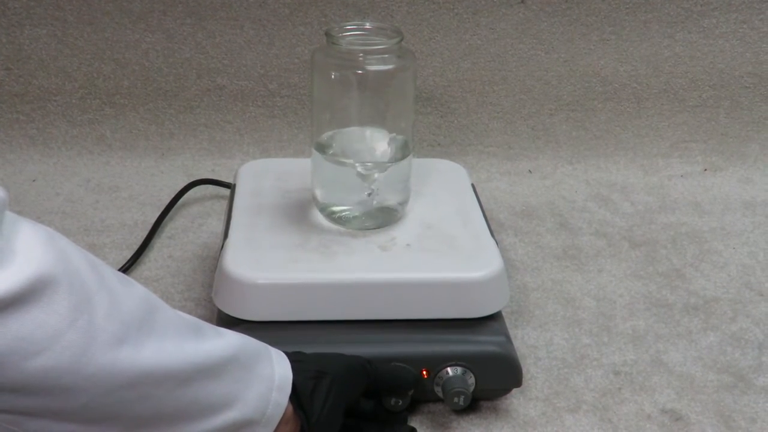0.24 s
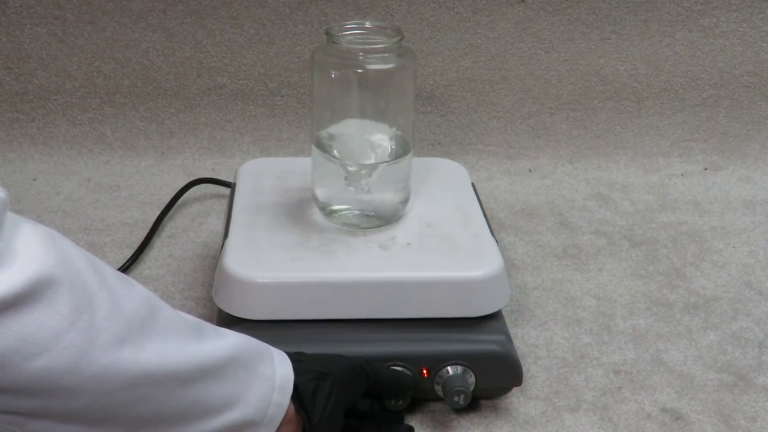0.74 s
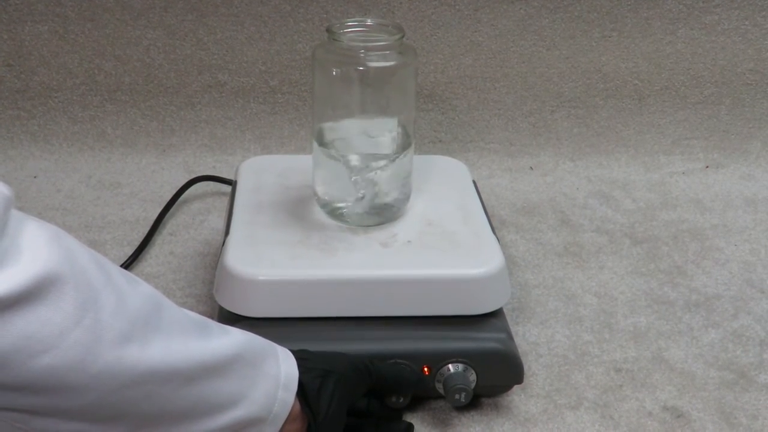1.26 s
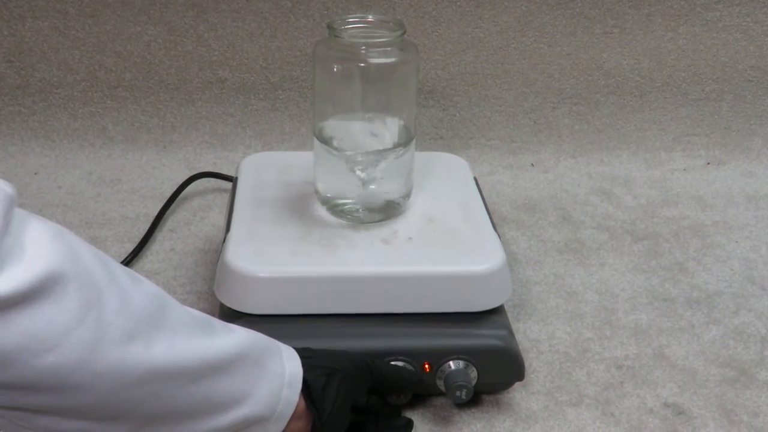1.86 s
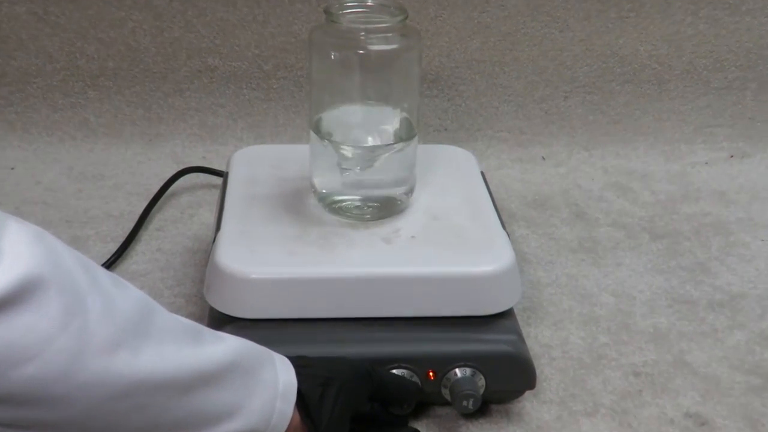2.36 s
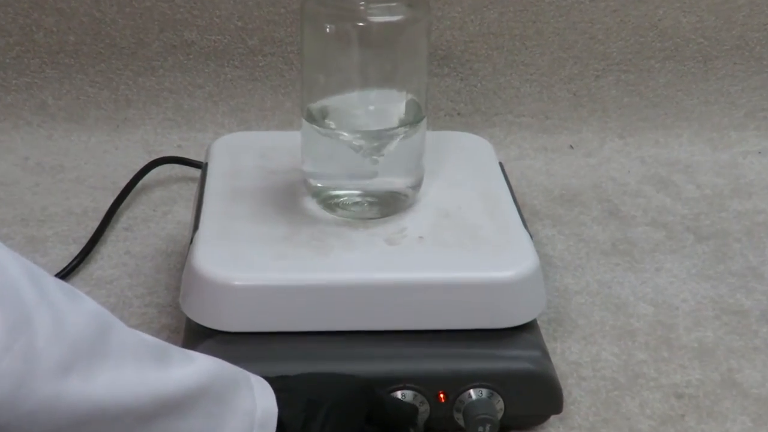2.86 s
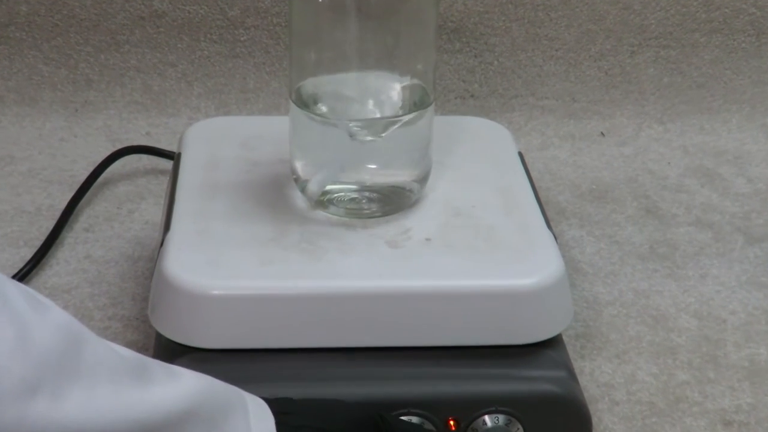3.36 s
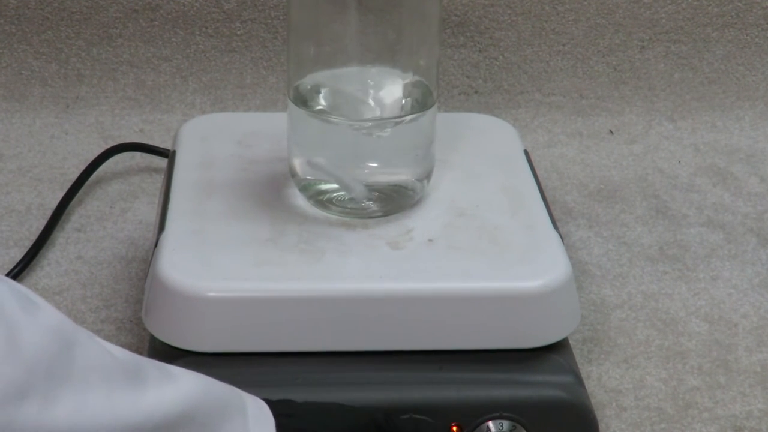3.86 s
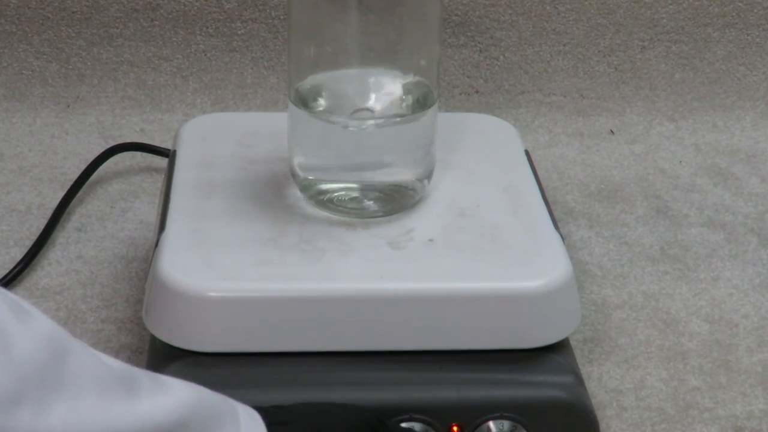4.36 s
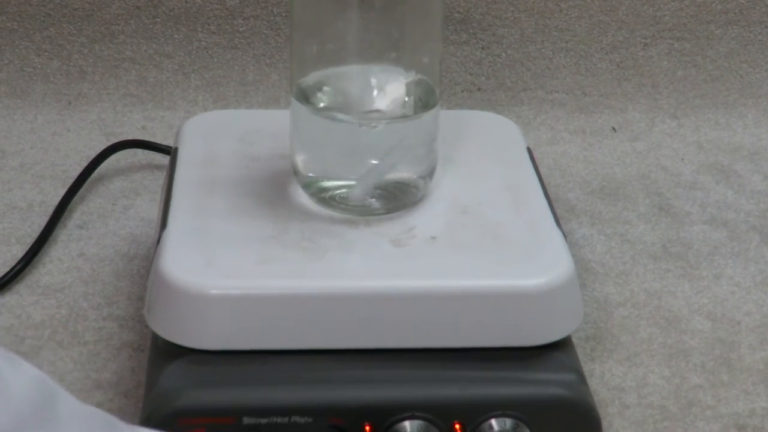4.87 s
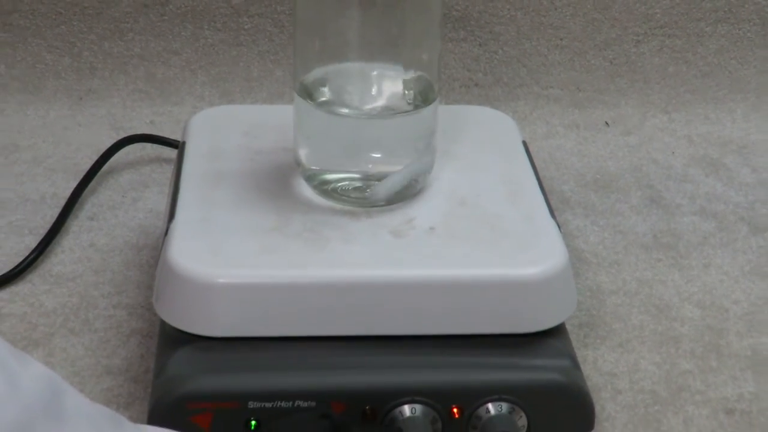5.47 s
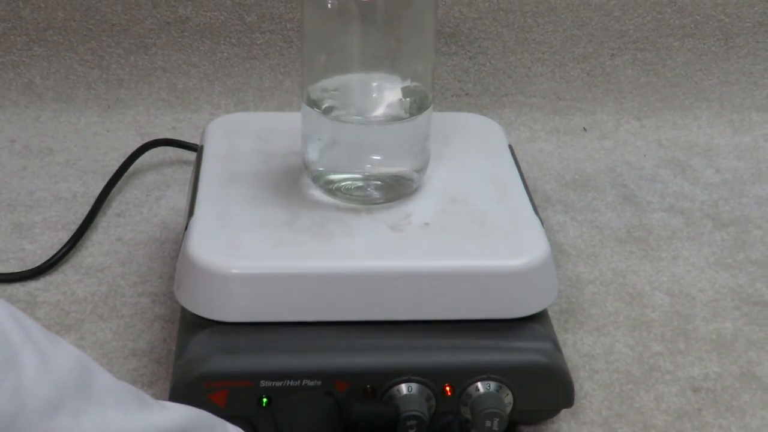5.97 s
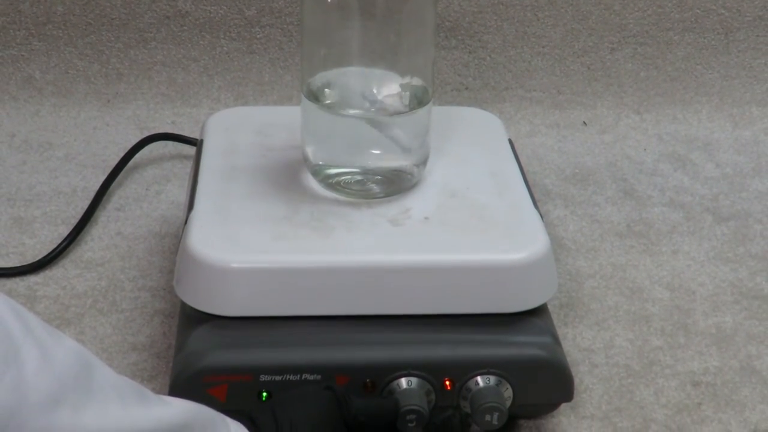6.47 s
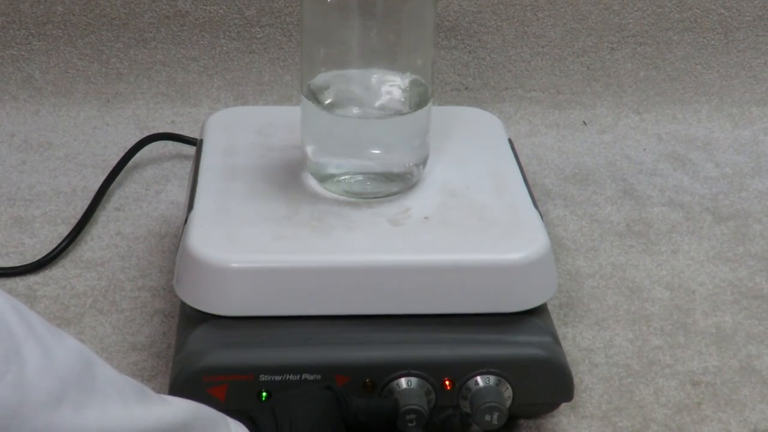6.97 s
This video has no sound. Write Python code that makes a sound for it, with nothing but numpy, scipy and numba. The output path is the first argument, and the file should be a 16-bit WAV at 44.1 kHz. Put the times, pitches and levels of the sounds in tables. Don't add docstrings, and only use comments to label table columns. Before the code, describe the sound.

A magnetic stir bar drags and rattles quickly around the base of a water-filled glass jar, dull and choked by froth. Just after one second it hammers hard with gulping bubbles, then jumps loose, clinking irregularly with brighter glass ring as the water clears. Wall blows get harder towards the end. A small motor hums below, in a quiet, nearly dry room, miked close in narrow stereo.

```python
import sys
import numpy as np
from scipy import signal
from scipy.fft import rfft, irfft, next_fast_len
from scipy.io import wavfile
from scipy.ndimage import uniform_filter1d
from numba import njit

SR = 44100
rng = np.random.default_rng(int(sys.argv[2]) if len(sys.argv) > 2 else 0)


def generate_wav(sig):
    pcm = np.round(np.clip(np.atleast_2d(sig).T, -1, 1) * 32767).astype(np.int16)
    wavfile.write(sys.argv[1], SR, pcm)


def gain_from_db(level_db):
    decades = np.asarray(level_db, float) / 20
    return 10 ** decades


N = 318402


def rms_one(x):
    return x / np.sqrt(np.mean(x ** 2) + 1e-20)


def in_time(rows):
    t, *columns = np.transpose(rows)
    return [np.interp(np.arange(N) / SR, t, column) for column in columns]


def at_hz(points, hz):
    f, value = np.transpose(points)
    return np.interp(np.log(hz + 1), np.log(f + 1), value)


def coloured(spectrum):
    size = next_fast_len(N)
    shape = gain_from_db(at_hz(spectrum, np.arange(size // 2 + 1) * SR / size))
    white = rng.standard_normal(size)
    return rms_one(irfft(rfft(white) * shape, size)[:N])


def drift(rate_hz):
    low = signal.butter(2, rate_hz, fs=SR, output="sos")
    return rms_one(signal.sosfilt(low, rng.standard_normal(N + SR))[SR:])


# f/Hz, level/dB rms
MOTOR_LINES = [(62, -63.5), (156, -52.5), (640, -52.5)]


def motor():
    t = np.arange(N) / SR
    out = 0
    for hz, level_db in MOTOR_LINES:
        level = gain_from_db(level_db + 3 * drift(7.4))
        out = out + level * np.sin(2 * np.pi * hz * t + 1.17 * drift(2.67))
    return out


# f/Hz, level/dB per Hz
FLOOR_SPECTRUM = [(25, -25), (60, -5.5), (140, -1), (660, -5), (2430, -12), (2800, -25), (7300, -27),
                  (11000, -52)]
FLOOR_DB = -44


def room_floor():
    return gain_from_db(FLOOR_DB) * coloured(FLOOR_SPECTRUM)


# t/s, plate level/dB, base level/dB, high glass level/dB
RATTLING = [(.003, -23, -12, -33), (.021, -35, -5.5, -37), (.042, -21.5, -6.5, -32), (.107, -27, -10, -33),
            (.16, -28, -12.5, -41), (0.181, -26.5, -11, -40), (0.205, -25.5, -8, -35),
            (0.256, -28, -16, -39), (.354, -20, -27, -36), (.388, -18.5, -14, -25.5),
            (0.421, -17, -21, -25.5), (0.467, -14, -4, -30), (.518, -15.5, -2, -13.5),
            (0.564, -19.5, -15, -29), (.597, -25, -10.5, -23), (0.618, -22, -38, -57),
            (.655, -21.5, -14, -32), (0.7, -26.5, -26.5, -64), (.739, -19.5, -9, -32),
            (.798, -17, -14, -31), (0.852, -21, -6.5, -35), (0.884, -25, -9, -57),
            (0.907, -20.5, -11.5, -57), (0.936, -18.5, -18, -49), (.972, -22, -5, -42),
            (1.008, -20, -29, -56), (1.057, -13.5, -14, -40), (1.098, -27, -7, -28),
            (1.135, -22.5, -10, -17)]
# t/s, plate, base, high glass level/dB
TICKS = [(.066, -28.5, -18, -34), (.14, -31.5, -17, -46), (.229, -27.5, -14.5, -35), (.294, -29, -42, -49),
         (.312, -27, -30, -48), (0.37, -33, -31, -36), (.828, -37, -23, -59), (0.856, -28, -6, -49),
         (1.195, -23, -29, -50), (1.222, -34, -45, -50), (1.264, -29, -36, -34), (1.335, -44, -30, -30),
         (1.404, -46, -33, -36), (1.51, -34, -50, -54), (1.075, -41, -14, -48), (1.116, -25, -26, -48),
         (1.297, -31, -37, -46), (1.366, -43, -36, -45), (1.437, -25, -22, -48), (1.463, -31, -40, -50),
         (1.63, -25, -47, -54), (2.154, -35, -42, -54), (2.8, -22, -33, -46), (3.225, -32, -33, -63),
         (4.208, -32, -39, -48), (4.93, -18, -36, -40), (5.191, -35, -35, -50), (5.22, -32.5, -40, -60),
         (5.4, -32.5, -47, -52), (5.414, -33.5, -50, -68), (5.775, -27, -35, -37), (5.975, -21.5, -43, -44),
         (7.036, -25, -31.5, -49), (7.106, -21.5, -39, -40), (7.13, -34, -36, -50), (7.152, -25, -37, -48),
         (7.178, -25, -29, -46)]
# t/s, plate, base, high glass level/dB
HAMMERING = [(1.163, -21, -41, -27), (1.25, -25.5, -48, -38), (1.28, -10, -51, -51),
             (1.314, -8, -13.5, -19.5), (1.348, -11.5, -19, -31), (1.384, -8.5, -12.5, -22),
             (1.423, -11, -6, -13), (1.449, -15, -47, -58), (1.477, -7.5, -47, -36),
             (1.548, -11.5, -35, -16), (1.568, -15.5, -54, -52)]
# t/s, plate, base, high glass level/dB
JUMPING = [(1.64, -9, -18, -17.5), (1.737, -23.5, -28.5, -30), (1.789, -15, -42, -41),
           (1.823, -15.5, -31.5, -40), (1.972, -15, -43, -34), (2.005, -15.5, -33, -42),
           (2.05, -17.5, -18.5, -30), (2.092, -18.5, -28, -54), (2.188, -11.5, -44, -34),
           (2.355, -12, -32, -40), (2.379, -21, -21.5, -35), (2.529, -12.5, -15.5, -27),
           (2.63, -24, -39, -31.5), (2.671, -22.5, -35, -40), (2.785, -21, -28, -32),
           (2.884, -16, -15, -27), (2.926, -25, -24, -62), (2.983, -25.5, -34, -46), (3.038, -17, 0.5, -25),
           (3.17, -22.5, -15.5, -34.5), (3.273, -26.5, -32.5, -44), (3.317, -21, -28, -37),
           (3.333, -25, -24, -26), (3.442, -21.5, -18.5, -37), (3.488, -24, -24.5, -40),
           (3.53, -22.5, -8.5, -29.5), (3.599, -20, -19.5, -22), (3.633, -20, -23, -34.5),
           (3.72, -24, -20.5, -42), (3.772, -17, -6, -32.5),
           (3.885, -24.5, -17, -39), (3.921, -21.5, -46, -39), (3.941, -22.5, -9.5, -29.5),
            (3.963, -20.5, -44, -39), (4.031, -19, -19, -30), (4.093, -24.5, -31, -37),
            (4.131, -22.5, -35, -35.5), (4.163, -16.5, -28, -42), (4.222, -32, -25.5, -44),
            (4.256, -24, -44, -57), (4.277, -21, -10, -34.5), (4.371, -21.5, -18, -32.5),
            (4.389, -18, -11.5, -29), (4.423, -20, -58, -33), (4.571, -13.5, -11.5, -16),
            (4.717, -24, -35, -39), (4.736, -16.5, -21, -12.5), (4.778, -25.5, -35, -32),
            (4.908, -18, -10.5, -24.5), (4.967, -20, -20, -24), (5.124, -22, -31, -30),
            (5.14, -16.5, -22.5, -30), (5.161, -23.5, -30, -29), (5.308, -12.5, -9.5, -23.5),
            (5.466, -20.5, -23.5, -35), (5.549, -16.5, -10.5, -17.5), (5.727, -16, -40, -28),
            (5.757, -22.5, -52, -37), (5.83, -16.5, -21, -26),
           (5.946, -19, -55, -34), (6.1, -19.5, -29, -42), (6.155, -15.5, -50, -66),
            (6.176, -26.5, -31, -44), (6.249, -13.5, -11.5, -28), (6.337, -13, -21, -30),
            (6.421, -17.5, -24.5, -30.5), (6.604, -19.5, -20.5, -30), (6.619, -14.5, -16, -52),
            (6.655, -14, -24, -45), (6.67, -23, -44, -21), (6.735, -17.5, -25.5, -30),
            (6.948, -13.5, -33, -27), (6.98, -18.5, -46, -19), (7.044, -15, -4.5, -26.5),
            (7.076, -23, -7, -31), (7.147, -29, -31, -57)]
# t/s, wall, shoulder, neck, lip level/dB
WALL_BLOWS = [(1.182, -19, -23, -47.0, -62.0), (1.422, -25, -33, -32, -45.0), (1.545, -30, -47, -30, -59.0),
              (1.736, -28, -36, -52, -57.0), (1.824, -44, -50.0, -35, -59.0), (1.946, -25.5, -40, -54, -48),
              (1.972, -49, -30.5, -46, -73.0), (2.093, -26.5, -51.0, -74.0, -71.0),
              (2.155, -33, -55, -59, -64.0), (2.215, -16, -19, -34, -51), (2.355, -24, -40, -47.0, -52),
              (2.399, -15, -29.5, -29.5, -25.5), (2.53, -21, -36, -34, -52.0), (2.63, -28, -33.5, -41, -67.0),
              (2.732, -21.5, -38, -38, -35), (2.785, -24.5, -54.0, -56, -59), (2.884, -34, -41, -41, -38),
              (2.982, -33.5, -45, -44, -40), (3.038, -64, -45, -42, -46), (3.17, -35, -46, -44, -42),
              (3.333, -29, -61.0, -48.0, -49.0), (3.531, -33.5, -49, -42.0, -48), (3.6, -42, -57, -47, -58),
              (3.645, -29.5, -43, -57, -46), (3.752, -30, -60, -43, -66), (3.772, -64, -61, -47, -59),
              (3.92, -19, -45, -50, -61), (3.965, -28.5, -41, -38, -60), (4.094, -20, -33, -64, -40),
              (4.163, -31.5, -56.0, -38, -40), (4.255, -22, -63, -63, -60.0), (4.389, -62, -63, -63, -76.0),
              (4.571, -28, -31, -51, -55), (4.716, -24.5, -49, -65.0, -47), (4.737, -19, -29.5, -28, -33),
              (4.777, -16.5, -64, -33, -59.0), (4.907, -27, -44, -44, -61.0),
              (5.021, -16, -37, -73, -33), (5.123, -18, -40.0, -47, -40), (5.14, -18.5, -29.5, -68.0, -60.0),
         (5.308, -26, -36, -38, -34), (5.547, -35, -36, -31, -45), (5.644, -21, -49.0, -35, -59),
         (5.664, -21, -73, -67, -57.0), (5.68, -36, -37, -46, -38), (5.727, -23, -34, -33, -34),
         (5.776, -20, -47, -38, -59.0), (5.832, -28, -39, -46.0, -62), (5.938, -17.5, -27.5, -40, -58),
         (6.053, -25.5, -43, -41, -42), (6.099, -30.5, -59, -70.0, -43), (6.156, -19, -61, -60, -65),
         (6.177, -46, -69, -72.0, -42), (6.258, -15.5, -42, -54, -72.0), (6.297, -20, -59.0, -34, -30.5),
         (6.319, -12, -26, -32, -64), (6.328, -38, -18.5, -45, -59), (6.394, -29, -68, -38, -29.5),
         (6.419, -40, -40, -62, -53), (6.489, -14.5, -33, -42.5, -29.5), (6.504, -13.5, -63, -26, -47),
         (6.619, -15.5, -27, -25.5, -27), (6.655, -29, -42, -49.0, -29), (6.672, -14, -22, -27, -38),
         (6.735, -36, -50, -66, -71), (6.791, -27, -30, -35, -34), (6.8, -12, -17, -27, -51),
         (6.84, -32, -22.5, -69, -76), (6.949, -26.5, -53, -60, -66.0), (6.98, -49, -46, -31.5, -46),
         (7.044, -27, -30, -44, -38)]
FROTH_WALL_DB, FROTH_NECK_DB, CLEAR_WALL_DB, CLEAR_NECK_DB = -12, -21.5, -21.5, -35
BLOW_PLATE_DB, BLOW_BASE_DB, BLOW_HIGH_DB = -15.5, -30.5, -18


def contacts():
    frothy = [(s, plate, plate + FROTH_WALL_DB, base, high, *[plate + FROTH_NECK_DB] * 3)
              for s, plate, base, high in RATTLING + HAMMERING]
    clear = [(s, plate, plate + CLEAR_WALL_DB, base, high, *[plate + CLEAR_NECK_DB] * 3)
             for s, plate, base, high in JUMPING + TICKS]
    blows = [(s, wall + BLOW_PLATE_DB, wall, wall + BLOW_BASE_DB, wall + BLOW_HIGH_DB, *upper)
             for s, wall, *upper in WALL_BLOWS]
    return np.array(frothy + clear + blows)


def strikes(level_db):
    clicks = np.zeros(N)
    np.add.at(clicks, np.round(contacts()[:, 0] * SR).astype(int), gain_from_db(level_db))
    return clicks


def after(level_db, decay_s):
    decaying = signal.lfilter([1], [1, -np.exp(-1 / (decay_s * SR))], strikes(level_db) + 1e-18)
    return uniform_filter1d(decaying, size=61, origin=30)


# t/s, level/dB, decay/s
SCRAPES = [
    (.002, -21.5, 0.0099),
    (1.141, -19.5, 0.018),
    (4.996, -10.5, 0.0057),
    (7.106, -33.5, 0.066),
]


def scrapes():
    t = np.arange(N) / SR
    return sum(gain_from_db(level_db) * (t > s) * np.exp(-np.abs(t - s) / decay_s) for s, level_db, decay_s in SCRAPES)


# t/s, level/dB
DRAG = [(0, -32.5), (.3, -31.5), (.5, -44.5), (1.05, -24.5), (1.5, -34), (1.62, -60.5), (7.3, -46.5)]
SLIPS_PER_S, SLIP_DECAY_S, SLIP_SHARE = 85, .004, .8


def skidding():
    drag = gain_from_db(in_time(DRAG)[0]) + scrapes()
    slip_count = np.cumsum(SLIPS_PER_S / SR * gain_from_db(2.5 * drift(27)))
    since_slip = slip_count % 1 / SLIPS_PER_S
    pulses = uniform_filter1d(np.exp(-since_slip / SLIP_DECAY_S), size=61)
    slips = rms_one(pulses * gain_from_db(6.4 * drift(30)))
    return drag * (1 - SLIP_SHARE + SLIP_SHARE * slips)


@njit
def ring(clicks, tuning, damping, turn, loss, rise):
    out = np.zeros(len(clicks))
    push, swell, z, step, soft = 0j, 0j, 0j, 0j, 0j
    for i in range(len(clicks)):
        if i % 32 == 0:
            step = np.exp(complex(-loss * damping[i], turn * tuning[i]))
            soft = step * rise
        push = push * soft + clicks[i]
        swell = swell * soft + push * (1 - rise)
        z = z * step + swell * (1 - rise)
        out[i] = z.imag
    return out


def body(modes, level_db, tuning, damping, rubbing, spread_db, rise_s, chatter_db, lean_db=0):
    out = 0
    chance = rng.standard_normal((len(level_db), len(modes)))
    skids = np.flatnonzero(rng.random(N) < 600 / SR)
    skid_size = (after(level_db + chatter_db, decay_s=0.012) + rubbing)[skids]
    rise = np.exp(-1 / (rise_s * SR))
    for k, ((hz, mode_db, t60), luck) in enumerate(zip(modes, chance.T)):
        clicks = strikes(level_db + mode_db + spread_db * luck - (-1) ** k * lean_db).astype(complex)
        random_phase = rng.standard_normal((len(skids), 2)) @ [1, 1j]
        clicks[skids] += gain_from_db(mode_db) * skid_size * random_phase
        turn, loss = 2 * np.pi * hz / SR, np.log(1000) / (t60 * SR)
        out = out + ring(clicks, tuning, damping, turn, loss, rise)
    return out


# f/Hz, level/dB, t60/s
PLATE_MODES = [(190.6, -19, 0.15), (250.1, -18, 0.16), (320, -16, 0.16), (406, -2, 0.071),
               (489.4, -8.5, 0.078), (943, -13.5, 0.057), (1159.3, -1.5, 0.046), (1279, -6.5, 0.033),
               (1563, -5.5, 0.043), (1970, 2, 0.014), (2066, -1.5, 0.022)]


def plate_knock(plate_db, air, rub):
    still = np.ones(N)
    thud = body(PLATE_MODES[:5], plate_db, still, still, rub * gain_from_db(-6.5),
                spread_db=2.5, rise_s=0.0013, chatter_db=-12.0)
    knock = body(PLATE_MODES[5:], plate_db, still, still, rub * gain_from_db(-37.0),
                 spread_db=3.0, rise_s=0.00084, chatter_db=-12.5)
    return air ** -.4 * thud + knock


# t/s, upper pair level/dB, lean to higher mode of lower pair/dB
BEARINGS = [(1.477, 12, 0), (1.736, 15, 0), (2.215, 3.5, 2.5), (2.399, 10, 4), (2.982, 12, 6),
            (3.92, -14, 1.5), (4.255, -7, 2.5), (4.907, -5, 6.5), (5.664, -24, -0.5), (5.727, -12, 4),
            (5.938, 4.5, -6), (6.259, -12, 0), (6.319, 5.5, 3.5), (6.395, 12, -1), (6.504, 6.5, 5),
            (6.672, 4, 5), (6.8, 6, 2.5)]


def bearing(s):
    at, upper_db, lean_db = np.transpose(BEARINGS)
    near = np.abs(s[:, None] - at) < .003
    return near @ upper_db, near @ lean_db


# f/Hz, level/dB, t60/s
WALL_MODES = [(2361, -5.5, 0.84), (2388.4, 0, 0.39), (2582, -15.5, 0.63), (2560.6, -7.5, 0.84)]


def wall_ring(s, wall_db, wall, slosh, damping, rub):
    upper_db, lean_db = bearing(s)
    lower = body(WALL_MODES[:2], wall_db + 0.09, wall * slosh, damping, rub * gain_from_db(-16.0),
                 spread_db=3.5, rise_s=0.0017, chatter_db=-14.5, lean_db=lean_db)
    upper = body(WALL_MODES[2:], wall_db + upper_db, wall ** 0.78 * slosh, damping, rub * gain_from_db(-28.5),
                 spread_db=1.5, rise_s=0.0024, chatter_db=-15.5)
    return lower + upper


# f/Hz, level/dB, t60/s
SHOULDER_MODES = [(4022, 1, 0.42), (4068, -5, 0.4)]


def shoulder_ring(shoulder_db, wall, air, touch, rub):
    return body(SHOULDER_MODES, shoulder_db, wall ** 0.89, air ** 0.71 * touch, rub * gain_from_db(-31.5),
                spread_db=4.0, rise_s=0.00092, chatter_db=-38.5)


# t/s, f/Hz
BASE_HZ = [(0, 3526), (.185, 3435), (.29, 3730), (.44, 3850), (.465, 3380), (.53, 3110), (.71, 3060),
           (.738, 3610), (.8, 3124), (.895, 3165), (.95, 3580), (1.13, 3926), (1.5, 4060), (1.9, 3250),
           (2.13, 3222), (2.34, 3478), (3.2, 3439), (7.3, 3382)]
# t/s, level/dB
BASE_LOAD = [(0, 1), (2.1, 5.5), (2.35, 0.8), (3.0, 1.6), (3.5, 8), (5.7, 5), (6.2, 6), (7.3, 1.5)]
# f/multiple of base pitch, level/dB, t60/s
BASE_MODES = [(1.001, -8.5, 0.26), (.965, -0.5, 0.027), (1.012, -2, 0.047), (1.01, 8, 0.008),
              (.905, -23, 0.058)]
# f/multiple of base pitch, level/dB, t60/s
FROTHY_BASE_MODES = [(.95, -13, 0.11), (1.022, -17, 0.092), (1.05, -14, 0.11)]


def base_ring(level_db, air, rub):
    pitch, = in_time(BASE_HZ)
    damping = air ** 0.95 * gain_from_db(in_time(BASE_LOAD)[0]) + after(level_db + 1.5, decay_s=0.031)
    froth = np.clip(2 * (air - 1), 0, 1)
    out = 0
    for modes, share in ((BASE_MODES, 1), (FROTHY_BASE_MODES, froth)):
        for mode in modes:
            scattered = pitch * (1 + 0.016 * (air - .85) * drift(45.3))
            out = out + share * body([mode], level_db, scattered, damping, rub * gain_from_db(-12.0),
                                     spread_db=3.0, rise_s=0.0011, chatter_db=-12.5)
    return out


# f/Hz, level/dB, t60/s
NECK_MODES = [(4862, -2, 0.17), (4890, -8, 0.15)]
# f/Hz, level/dB, t60/s
COLLAR_MODES = [(7170, -8, 0.07), (7262, 0, 0.11), (7370, -7, 0.16)]
# f/Hz, level/dB, t60/s
LIP_MODES = [(5456, 1, 0.15), (5490, -7, 0.1)]


def rim_ring(neck_db, high_db, lip_db, slosh, air, rub):
    out = body(NECK_MODES, neck_db, slosh, air ** 1.1, rub * gain_from_db(-42.0),
               spread_db=4.0, rise_s=0.00038, chatter_db=-6.0)
    out += body(COLLAR_MODES, np.maximum(neck_db - 3.0, high_db - 13.0), slosh, air, rub * gain_from_db(-43.0),
                spread_db=6.5, rise_s=0.001, chatter_db=-13.5)
    out += body(LIP_MODES, lip_db, slosh, air, 0 * rub, spread_db=1.0, rise_s=0.0028, chatter_db=-20.0)
    return out


# f/Hz, level/dB, t60/s
HIGH_MODES = [(6146, -14, 0.14), (6284, -8.5, 0.12), (6353, 0.5, 0.052), (6510, -4.5, 0.041),
              (6720, -9, 0.05)]
# f/Hz, level/dB
TOP_MODES = [(8520, -29.5), (8900, -36), (9700, -31), (10250, -34.5), (10800, -28), (11400, -30),
             (12100, -33), (12600, -28), (13500, -43)]
AIR_LIFT_PER_DB, AIR_LIFT_TOP = .007, .05


def high_ring(high_db, lip_db, air_db, air, rub):
    lift = 1 + np.clip(AIR_LIFT_PER_DB * (air_db - 3.5), 0, AIR_LIFT_TOP)
    out = body(HIGH_MODES, high_db, lift * (1 + 0.0079 * drift(6.7)), air ** 1.06, rub * gain_from_db(-18.5),
               spread_db=4.5, rise_s=0.0011, chatter_db=-10.5)
    pairs = [(hz * split, mode_db + 5.0, .055) for hz, mode_db in TOP_MODES for split in (1, 1.017)]
    out += body(pairs, np.maximum(high_db, lip_db + 7.0), 1 + 0.0051 * drift(9.0), air ** 1.1,
                rub * gain_from_db(-33.0), spread_db=4.5, rise_s=0.0016, chatter_db=-6)
    return out


# f/Hz, level/dB per Hz
CRACK_SPECTRUM = [(300, -28), (750, -27), (1100, -2.5), (1500, 8.5), (2300, 6.5), (4200, -2.5),
                  (7000, -26.5), (14000, -28)]


def crack(plate_db, rub):
    level = after(plate_db - 9.0, decay_s=0.0033) + after(plate_db - 25.0, decay_s=0.02) + rub * gain_from_db(-11.0)
    return level * gain_from_db(3.46 * drift(170)) * coloured(CRACK_SPECTRUM)


# f/Hz, level/dB per Hz
FIZZ_SPECTRUM = [(700, -25.5), (4500, 3.5), (7000, -4), (13000, -19), (15500, -31.5)]


def fizz(base_db, high_db):
    level = after(high_db - 14.0, decay_s=0.014) + 2 * scrapes() ** 2
    level += after(base_db + high_db + 1.5, decay_s=0.0011)
    return level * coloured(FIZZ_SPECTRUM)


# t/s, f/Hz, level/dB
BUBBLES = [
    (1.17, 635, -32),
    (1.285, 723, -26.5),
    (1.5, 820, -29),
    (4.998, 783, -25),
    (5.884, 863, -27.5),
]


def bubbles():
    out = np.zeros(N + SR)
    age = np.arange(SR // 5) / SR
    for s, hz, level_db in BUBBLES:
        for late, size in zip(rng.uniform(0, .012, 3), (1, .86, 1.2)):
            start = int((s + late) * SR)
            tone = np.sin(2 * np.pi * hz * size * age * (1 + 2.7 * age))
            out[start:start + len(age)] += gain_from_db(level_db) * np.exp(-age / 0.01) * tone
    return out[:N]


# t/s, wall tuning factor as the vortex wets it, glass damping by entrained air/dB
WATER = [(0, 1.0, 3), (.45, 1.0, 9), (.95, 1.0, 9), (1.1, 1.0, 15), (1.45, .955, 13), (1.69, .94, 15),
         (1.74, .915, 3), (1.84, .948, 2), (2.23, .947, 1), (2.42, .966, 1), (2.75, .968, 0), (3.2, .98, 0),
         (4.6, .998, 0), (7.3, 1.0, 0)]


def clatter():
    s, plate_db, wall_db, base_db, high_db, shoulder_db, neck_db, lip_db = contacts().T
    wall, air_db = in_time(WATER)
    air, rub = gain_from_db(air_db), skidding()
    touch = 1.5 + after(plate_db + 15.0, decay_s=0.014)
    slosh = 1 + 0.0015 * drift(32.0)
    out = plate_knock(plate_db, air, rub)
    out += wall_ring(s, wall_db, wall, slosh, air * touch, rub)
    out += shoulder_ring(shoulder_db, wall, air, touch, rub)
    out += base_ring(base_db + 7.0, air, rub)
    out += rim_ring(neck_db, high_db, lip_db, slosh, air, rub)
    out += high_ring(high_db, lip_db, air_db, air, rub)
    return out + crack(plate_db, rub) + fizz(base_db, high_db) + bubbles()


def room(x, t60, band_hz):
    t = np.arange(SR // 2) / SR
    tail = rng.standard_normal((2, len(t))) * gain_from_db(-60 * t / t60) * (t > .002)
    tail = signal.sosfilt(signal.butter(1, band_hz, "band", fs=SR, output="sos"), tail)
    return signal.fftconvolve(x[None], tail / np.linalg.norm(tail[0]), axes=1)[:, :N]


def scene():
    jar = signal.sosfilt(signal.butter(2, 170, "high", fs=SR, output="sos"), clatter())
    mid = jar + motor() + gain_from_db(2.0 * drift(34.0)) * room_floor()
    thud_band = signal.butter(1, [280, 480], "band", fs=SR, output="sos")
    side = gain_from_db(-14) * room_floor()
    side += gain_from_db(-15.5) * signal.sosfilt(thud_band, jar)
    low_room = gain_from_db(-22.0) * room(jar, t60=0.27, band_hz=[150, 900])
    high_room = gain_from_db(-11.5) * room(jar, t60=0.14, band_hz=[4500, 15000])
    return mid + side * np.array([[1], [-1]]) + low_room + high_room


# f/Hz, left lead/radians
PORT_PHASE = [(9000, 0), (9900, 1.7), (11400, 2.1), (13000, 1.3)]


def microphone_ports(dry):
    size = next_fast_len(N)
    f, radians = np.transpose(PORT_PHASE)
    turn = np.exp(-1j * np.interp(np.arange(size // 2 + 1) * SR / size, f, radians))
    right = irfft(rfft(dry[1], size) * turn, size)[:N]
    return np.array([dry[0], gain_from_db(-.4) * right])


def top_cut(x):
    return signal.sosfilt(signal.butter(12, 15820, fs=SR, output="sos"), x)


def record(dry):
    low_pass = signal.cheby2(10, 60, 16300, fs=SR, output="sos")
    both = signal.sosfilt(low_pass, microphone_ports(dry))
    return top_cut(np.clip(both, -1, 1))


dry = scene()
out = record(dry)
generate_wav(out)
```